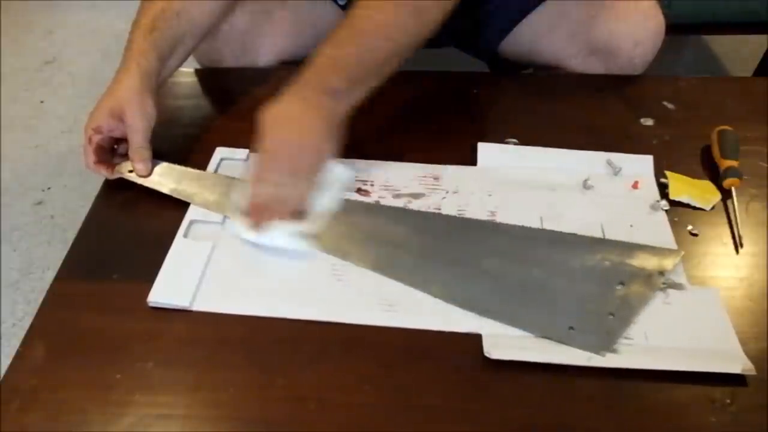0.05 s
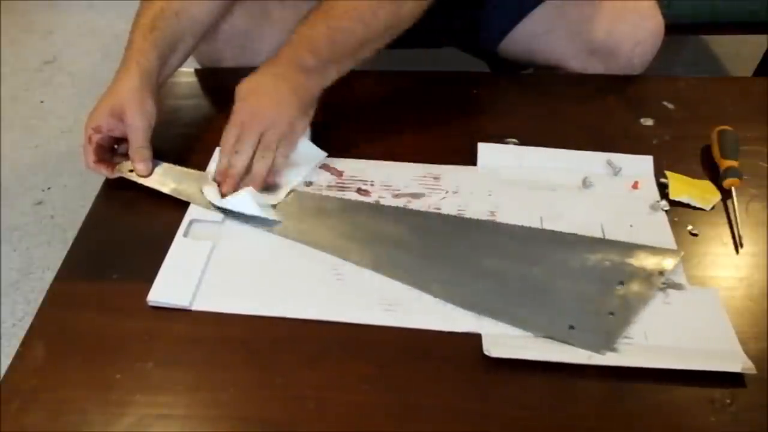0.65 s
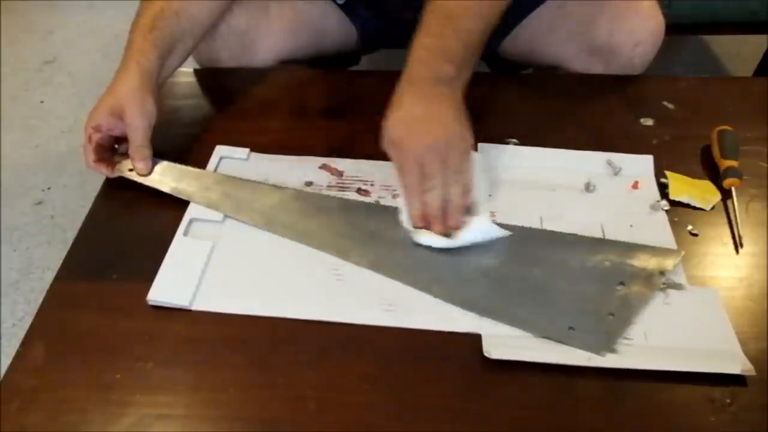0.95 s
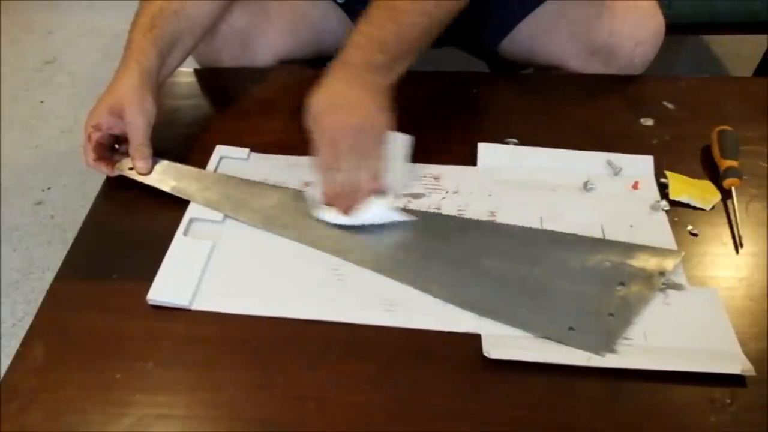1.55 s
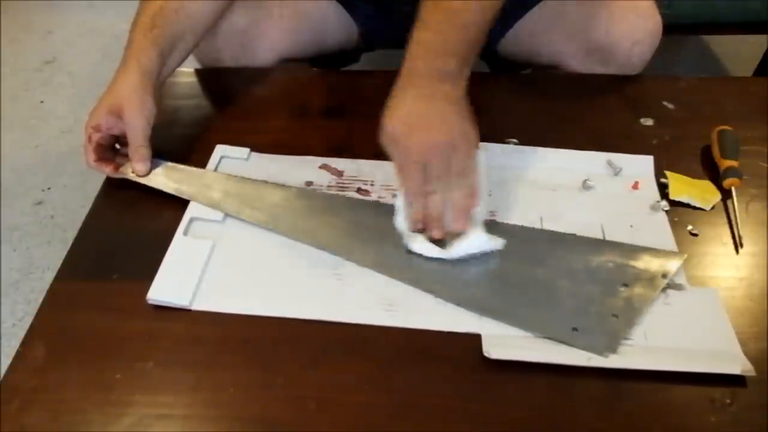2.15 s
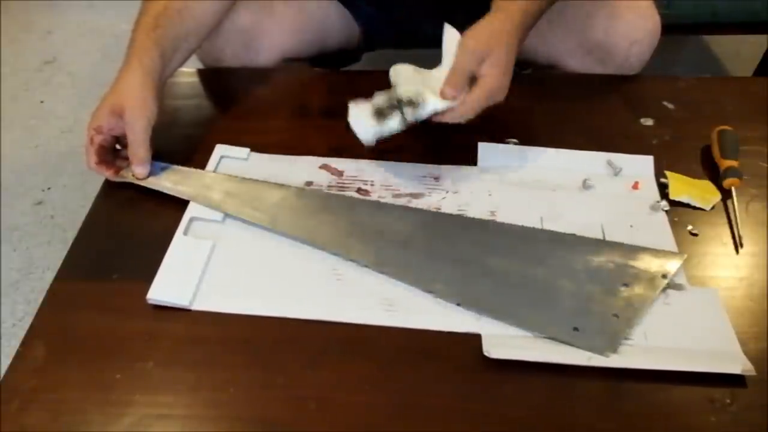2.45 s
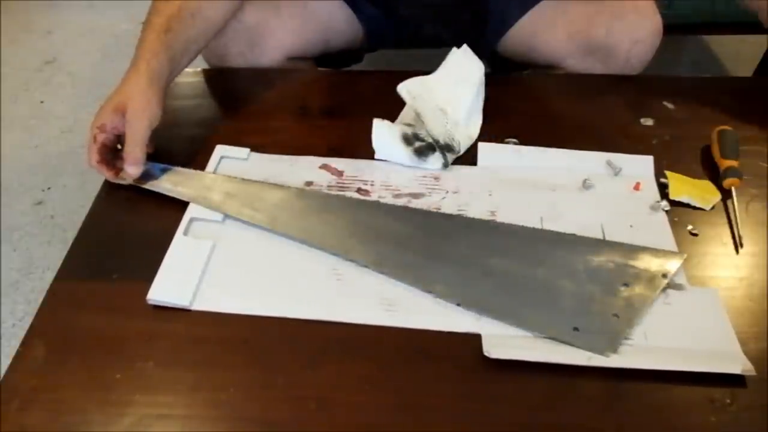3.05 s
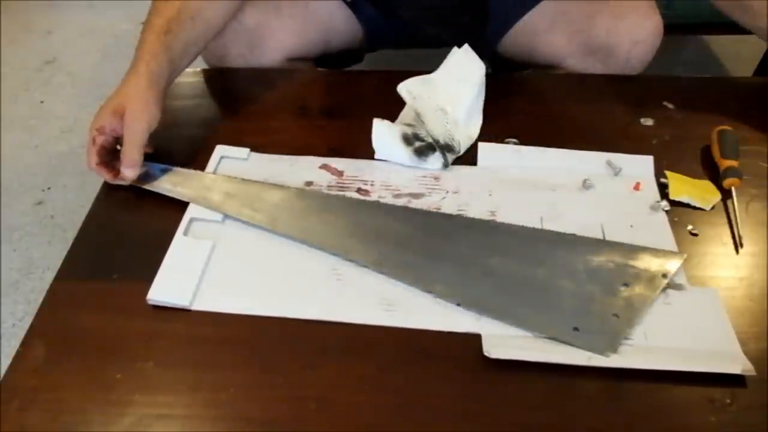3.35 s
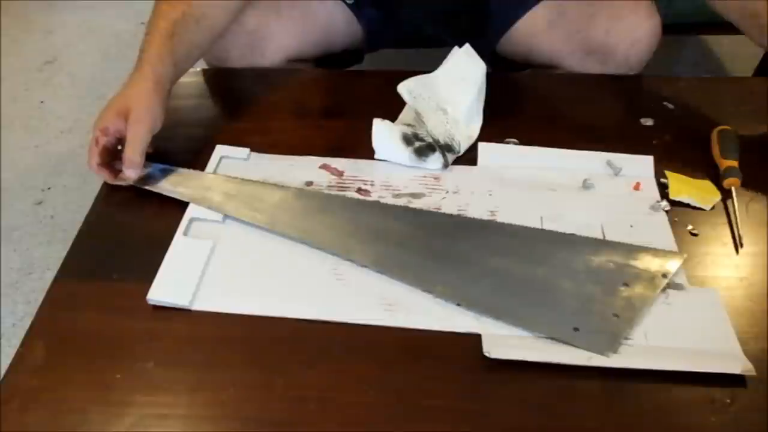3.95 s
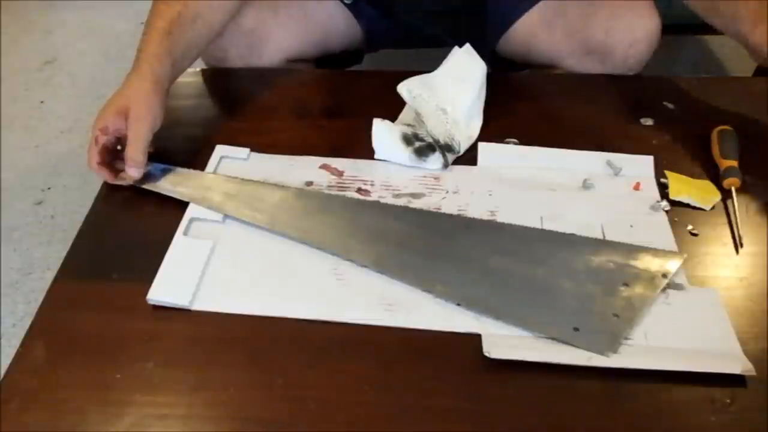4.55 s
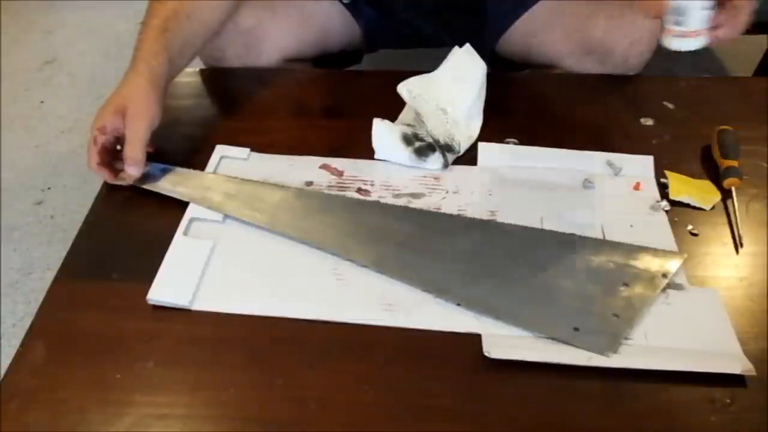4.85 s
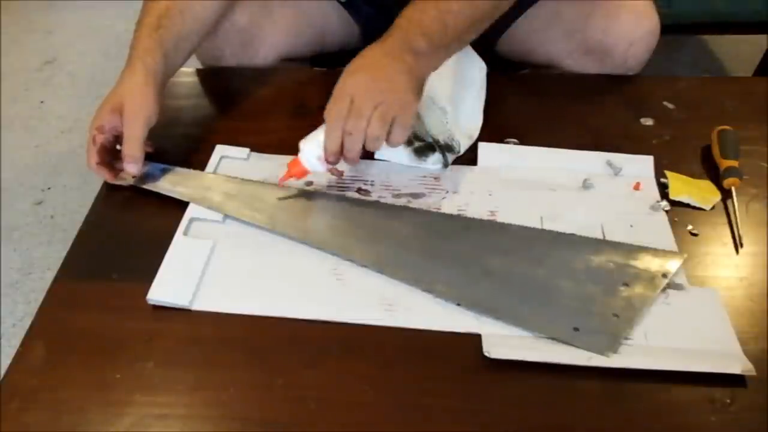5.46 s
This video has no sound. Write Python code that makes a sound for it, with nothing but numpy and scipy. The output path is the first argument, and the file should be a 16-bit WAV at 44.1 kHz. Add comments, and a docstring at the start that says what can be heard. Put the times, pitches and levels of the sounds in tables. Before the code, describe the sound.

In a small room with softly rushing air, a steel saw blade is wiped with a paper towel in about eight quick, hissing strokes, rattling lightly on a wooden table close by. After a rustle and a few clacks, an object lands on the table with a hard, resonant knock, by far the loudest sound, and quickly rocks to rest. Faint scuffs, small hollow bottle taps and a sharp clink on the blade end it.

```python
"""A paper towel is wiped to and fro along a steel saw blade on a wooden table in a small room.
Its fibres hiss; once a stroke it grips and the blade chatters, and the blade clacks when let go.
Something is set down hard and rocks to rest, making the table top ring and boom. Light things
scuff about, then a small hollow bottle taps and its tip strikes the blade. Air rushes softly behind."""
import sys
import numpy as np
from scipy import signal
from scipy.fft import rfft, irfft
from scipy.io import wavfile
from scipy.ndimage import uniform_filter1d

SR = 44100
rng = np.random.default_rng(int(sys.argv[2]) if len(sys.argv) > 2 else 0)


def master(y):
    """Save y as 16-bit WAV."""
    cut = np.clip(np.atleast_2d(y).T, -1, 1)
    pcm = np.round(cut * 32767)  # scale
    wavfile.write(sys.argv[1], SR, pcm.astype(np.int16))


N = 252238
T = np.arange(N) / SR
RING_T = T[:SR]  # one second for a sound to ring out

# Levels in the tables are relative. A fade time is how long a sound takes to drop by 60 dB.
# Towel strokes, each lasting until the next:
# (start [s], hiss level [dB], grip time [s], grip half-length [s], chatter level [dB])
STROKES = [(-.01, -64.5, 0.22, 0.055, -50.5), (0.294, -63, .41, 0.1, -48), (0.547, -64, 0.74, 0.09, -58.5),
           (0.803, -64, .93, 0.098, -49.5), (1.051, -65.5, 1.23, 0.037, -64), (1.31, -64, 1.46, 0.068, -46),
           (1.55, -66.5, 1.842, 0.027, -47.5), (1.927, -65.5, 2.02, 0.12, -46.5)]
# Tone of the rubbing paper fibres: (frequency [Hz], level [dB])
HISS_TONE = [(200, -6.5), (600, 1), (1250, 0), (2300, 2), (2900, -1), (3500, -1), (4400, -3.5), (6000, -10),
             (7500, -21), (15000, -46)]
# Tone of their finer, higher hiss: (frequency [Hz], level [dB])
FINE_HISS_TONE = [(1500, -9), (4000, -3.5), (6000, -3), (7800, -7.5), (10300, -10), (13000, -18),
                  (15500, -22)]
# Tone of coarse rubbing and clacking: (frequency [Hz], level [dB])
RASP_TONE = [(80, -24), (200, -8), (380, -3), (550, -5), (780, -3), (1150, 0), (1650, -2.5), (2150, -4),
             (2800, -12.5), (3700, -14), (5000, -22.5), (9000, -41), (15000, -58)]
# Tone of the table shaking under the blade: (frequency [Hz], level [dB])
SHAKE_TONE = [(40, -34), (110, -13), (200, -7), (290, -5), (390, -6.5), (550, -12.5), (800, -8.5),
              (1600, -26.5), (6000, -61)]
# Notes the steel blade rings at: (frequency [Hz], level [dB], fade time [s])
BLADE_NOTES = [(1010, -12, 0.23), (1168, -2, 0.075), (1262, 7, 0.07), (1750, -13, 0.088),
               (2160, -10.5, 0.044), (2580, -15, 0.033), (3350, -7, 0.031), (3620, 0.5, 0.015),
               (4400, -32, .018), (4700, -10.5, 0.016), (5400, -22, 0.054), (5900, -22, .016)]
# The blade clacks: it slaps its support, and at the end the bottle's tip strikes it:
# (time [s], level [dB], brightness [dB/octave], clink against clack [dB])
BLADE_CLACKS = [(.204, -39.5, 4, -13), (.422, -46, 2, -20), (.46, -40, 2.5, -13), (.705, -44.5, -7, -12),
                (.945, -43, -4.5, -13), (1.086, -52, -8.5, -9), (1.245, -50, -8, -14),
                (1.439, -36.5, -3, -5), (1.479, -42, 1.5, -5), (1.593, -54.5, -11, -12),
                (1.82, -44.5, 0.5, -9), (1.938, -46, -2, -9), (2.012, -47, -5, -6), (2.6154, -37, 1.5, -5),
                (2.6756, -45.5, 8, -9), (2.6878, -32.5, -1.5, 6), (2.7261, -38, 1.5, -6),
                (2.744, -45, -1, -12), (4.072, -56.5, -0.5, -9), (4.1943, -47.5, -3.5, -5),
                (5.4643, -47, 0.5, -10), (5.684, -39, 6, 11), (5.69, -37.5, -3, 7.5),
                (5.7032, -48, 3.5, -11)]
# Single knocks on the table: (time [s], level [dB], contact cut-off [Hz])
TABLE_KNOCKS = [(3.3883, -30.5, 650), (3.6339, -21.5, 2380), (3.7126, -11, 5020), (3.8404, -19.5, 440),
                (4.1864, -31.5, 452)]
# Notes the table top rings at: (frequency [Hz], level [dB], fade time [s])
TABLE_NOTES = [(197, 1, .47), (226, -1, .36), (243, 4, .4), (256, -8, .4), (289, 3, .46), (317, -9, .4),
               (412, -7.5, .33), (436, -12, .36), (471, -7, .33), (502, -5, .4), (550, 1, .42),
               (580, -9, .38), (636, -6, .33), (672, 2.5, .38), (727, -15, .3), (841, -14, .45),
               (922, -7.5, .28), (1097, -13, .33), (1204, -19, .28), (1281, -14, .26), (1391, -20, .33),
               (1427, -17, .3), (1583, -27, .36), (1943, -22, .3), (2430, -26, .28), (2890, -31, .28)]
# Tone of a thud on the wood: (frequency [Hz], level [dB])
THUD_TONE = [(25, -52), (55, -22), (90, -19), (155, -15), (205, 1.5), (350, -1.5), (660, -4), (800, -15),
             (1250, -15), (1750, -24), (2500, -27.5), (4500, -41), (7000, -58), (15000, -80)]
# Tone of the table's deep boom: (frequency [Hz], level [dB])
BOOM_TONE = [(30, -44), (55, -12), (90, -8), (130, -1), (190, -2), (300, -19), (1000, -72.5)]
# Tone of the sharp tick at the landing and each bounce: (frequency [Hz], level [dB])
TICK_TONE = [(500, -13.5), (2500, 2), (5500, -3), (7500, -12), (10000, -11.5), (12000, -24), (15000, -37)]
# Scuffs as the towel is lifted and dropped and things are moved:
# (middle [s], half-length [s], level [dB], crinkle against rub [dB])
SCUFFS = [(2.49, 0.21, -58.5, -14), (2.686, 0.0093, -43.5, -10), (2.746, 0.03, -50, -25),
          (3.04, 0.022, -67, -32), (4.19, 0.044, -52, -25), (4.4, 0.015, -65.5, -24),
          (4.8, 0.013, -60, -24), (5.289, .03, -60.5, -11.5)]
# Taps of the bottle: (time [s], level [dB])
BOTTLE_TAPS = [(5.3832, -45), (5.409, -52), (5.453, -45.5), (5.475, -48)]
# Notes the hollow bottle rings at: (frequency [Hz], level [dB], fade time [s])
BOTTLE_NOTES = [(558, -3, 0.028), (1166, -15.5, 0.027), (2070, -18.5, 0.018)]
# Tone of the air in the room: (frequency [Hz], level [dB])
AIR_TONE = [(20, -16.5), (55, -6), (100, -6.5), (200, -0.5), (350, -3.5), (600, -5), (1100, -11.5),
            (1700, -19), (2800, -22), (3700, -28.5), (4900, -31), (7000, -43), (10000, -49.5), (15000, -60)]
# Faint pitches in that rush of air: (frequency [Hz], width [Hz], level [dB])
AIR_PEAKS = [(1435, 120, -19), (1963, 390, -15), (2412, 110, -21.5), (4310, 550, -26.5)]
# How unlike the two ears are: (frequency [Hz], opposite part against shared part [dB])
STEREO_WIDTH = [(60, -2), (150, -12), (300, -8.5), (600, -9), (1200, -7.5), (4000, -6), (9000, -0.5),
                (14000, -0.5)]


def wiping():
    """Countless fibres hiss, brighter as the hand speeds up; coarser slips rattle blade and table."""
    speed, hiss_gain, chatter = hand_strokes()
    hiss = unit(colour(stereo_noise(N, side_db=0.5) + undb(-4) * slips(3000, 2.8), HISS_TONE))
    fine = unit(colour(stereo_noise(N, side_db=0) + undb(-3) * slips(2500, 2.3), FINE_HISS_TONE))
    fibres = (hiss * speed ** .5 * undb(5) + fine * speed ** .82 * undb(-2.5)) * hiss_gain
    steel_ring = unit(through(slips(600, 2.2), ring(BLADE_NOTES)))
    scrape = unit(colour(slips(900, 3.06), RASP_TONE))
    rasp = (scrape + undb(-12) * steel_ring) * chatter * undb(-4.5)
    shake = unit(colour(slips(500, 2.3), SHAKE_TONE)) * chatter ** .5 * undb(-38.5)
    rattle = room(rasp + shake, early_db=-3.5, late_db=-7)
    return place(fibres, pan_db=1.2, lag_s=0) + place(rattle, pan_db=.7, lag_s=1e-5)


def hand_strokes(stop_s=2.297, loose_chatter_db=-61):
    """The hand speeds up, grips once and slows to turn: gives its speed, hiss gain and chatter gain."""
    speed, hiss_gain, grip = np.zeros((3, N))
    ends = [row[0] for row in STROKES[1:]] + [stop_s]
    for (start, db, grip_s, half_s, grip_db), end in zip(STROKES, ends):
        during = (T >= start) & (T < end)
        progress = np.clip((T - start) / (end - start), 0, 1)
        speed += during * np.sin(np.pi * progress ** .82)  # fastest just before mid-stroke
        hiss_gain += during * undb(db)
        grip += during * swell(grip_s, half_s, grip_db)
    speed, hiss_gain, grip = uniform_filter1d(np.array([speed, hiss_gain, grip]), SR // 55)
    speed = np.clip(speed, 1e-6, 1)
    chatter = (abs(grip) + undb(loose_chatter_db)) * speed ** .14
    return speed, hiss_gain, chatter


def blade_clacks(clack_fade_s=.017, bump_fade_s=.07):
    """Hitting its support or struck by the bottle's tip, the blade clacks, clinks and bumps the table."""
    out, clink = np.zeros((2, N)), ring(BLADE_NOTES)
    rasp, shake = click(RASP_TONE), click(SHAKE_TONE)
    for s, db, brightness, clink_db in BLADE_CLACKS:
        buzz, sway = rng.standard_normal((2, SR))
        clack = unit_hit(through(buzz * fade(clack_fade_s), rasp))
        bump = unit_hit(through(sway * fade(bump_fade_s), shake))
        bump_db = db - 7.5 - .38 * brightness  # a softer contact bumps more
        add(out, s, undb(db - 8.5) * harden(clack + undb(clink_db) * clink, brightness))
        add(out, s, undb(bump_db) / (1 + undb(clink_db)) * bump)
    return place(room(out, early_db=-2.5, late_db=-3), pan_db=.42, lag_s=3e-5)


def table_knocks():
    """Each knock rings the table top and the room; a soft, long push also makes the table boom."""
    out, ticks = np.zeros((2, 2, N))
    thud, tick, wood = unit_hit(click(THUD_TONE)), unit_hit(click(TICK_TONE)), ring(TABLE_NOTES)
    boom = unit_hit(through(echoes(.6, .4, side_db=-3), click(BOOM_TONE)))
    knocks = list(TABLE_KNOCKS)
    for s, db, contact_hz, tick_db in rocking(count=4):
        knocks.append((s, db, contact_hz))
        add(ticks, s, undb(tick_db) * tick)
    for s, db, contact_hz in knocks:
        rattle = unit_hit(through(echoes(.13, .06, side_db=-2), thud))
        walls = unit_hit(through(echoes(.62, .34, side_db=0), thud))
        body = wood + undb(-6) * thud + undb(-5) * rattle + undb(-3.5) * walls
        boom_gain = 170 / contact_hz  # as strong as the body at a cut-off of 170 Hz
        add(out, s, undb(db - 6) * (soften(body, contact_hz) + boom_gain * boom))
    return place(out + room(ticks, early_db=-4, late_db=-8), pan_db=.53, lag_s=6e-5)


def rocking(count, landing_s=3.6847, first_gap_s=.0647, gap_ratio=.75):
    """Something lands hard and rocks: each bounce comes sooner, weaker and duller than the last."""
    bounce = np.arange(count)
    gaps = first_gap_s * gap_ratio ** bounce
    times = landing_s + np.cumsum(gaps) - gaps
    knock_db, tick_db = -3.5 - 8.5 * bounce, -49.5 - 4.5 * bounce
    contact_hz = 9050 * .46 ** bounce
    return zip(times, knock_db, contact_hz, tick_db)


def scuffs():
    """Paper and other light things slide a little: a grainy rub, with hiss where paper crinkles."""
    rub_gain = sum(swell(s, half_s, db) for s, half_s, db, _ in SCUFFS)
    crinkle_gain = sum(swell(s, half_s, db + crinkle_db) for s, half_s, db, crinkle_db in SCUFFS)
    rub = unit(soften(colour(slips(900, 1.7), RASP_TONE), contact_hz=3500))
    crinkle = unit(colour(slips(3000, 1.8), HISS_TONE))
    crinkle += undb(-8) * unit(colour(slips(2500, 3.1), FINE_HISS_TONE))
    return room((rub * rub_gain + crinkle * crinkle_gain) * undb(-5), early_db=-1, late_db=-6)


def bottle_taps():
    """Soft taps make a hollow plastic bottle ring very briefly."""
    out = np.zeros((2, N))
    for s, db in BOTTLE_TAPS:
        add(out, s, undb(db - 4.5) * ring(BOTTLE_NOTES))
    return room(out, early_db=-8, late_db=-4)


def room_air():
    """A low, even rush of air with a few faint pitches in it."""
    rush = unit(colour(stereo_noise(N, side_db=4), AIR_TONE))
    for hz, width_hz, db in AIR_PEAKS:
        b, a = signal.iirpeak(hz, hz / width_hz, fs=SR)
        band = signal.lfilter(b, a, stereo_noise(N, side_db=-5))
        rush += undb(db) * unit(signal.lfilter(b, a, band))
    return place(rush * undb(-60), pan_db=1.5, lag_s=2e-5)


def room(x, early_db, late_db):
    """The direct sound, then quick echoes off the table top, then slower ones off the walls."""
    early, late = echoes(.025, .018, side_db=1), echoes(.52, .3, side_db=1)
    early = undb(early_db) * early / np.linalg.norm(early[0])
    late = undb(late_db) * late / np.linalg.norm(late[0])
    return x + through(x, early + late)


def echoes(bass_fade_s, treble_fade_s, side_db):
    """A wash of echoes, built octave by octave; the treble dies first."""
    spectrum, out = rfft(stereo_noise(SR, side_db)), 0
    octave = np.clip(np.log2((np.arange(SR // 2 + 1) + 1) / 125), 0, 7)
    for k, fade_s in enumerate(np.geomspace(bass_fade_s, treble_fade_s, 8)):
        band = irfft(spectrum * np.maximum(1 - abs(octave - k), 0))
        out = out + band * fade(fade_s)
    return out


def slips(per_s, spread_db):
    """Tiny random slips of uneven size, the grain of a rubbing sound."""
    kicks = (rng.random(N) < per_s / SR) * rng.choice([-1, 1], N)
    sizes = undb(spread_db * np.minimum(rng.exponential(size=N), 4))
    return unit(kicks * sizes)


def swell(middle_s, half_s, db, shape=1.58):
    """Gain of a rub that builds up and dies away; shape 1 is a spike, 2 a rounded hill."""
    return undb(db) * np.exp(-abs((T - middle_s) / half_s) ** shape)


def ring(notes):
    """A struck object's own notes fade away; neighbours start in opposite directions."""
    return unit_hit(sum((-1) ** k * undb(db) * np.sin(2 * np.pi * hz * RING_T) * fade(fade_s)
                        for k, (hz, db, fade_s) in enumerate(notes)))


def fade(fade_s):
    """A gain that drops by 60 dB in fade_s."""
    return np.exp(-np.log(1000) * RING_T / fade_s)


def harden(x, db_per_octave):
    """A harder contact tilts the sound towards the treble; a negative tilt dulls it."""
    return unit_hit(through(x, click([(200, 0), (12800, 6 * db_per_octave)])))


def soften(x, contact_hz):
    """A softer contact pushes for longer and barely stirs the notes above its cut-off."""
    lowpass = signal.butter(3, min(contact_hz, SR / 3), fs=SR, output="sos")
    return unit_hit(signal.sosfilt(lowpass, x))


def click(tone):
    """The sharpest click that has this tone."""
    cepstrum = irfft(np.log(tone_gains(tone, SR)))
    cepstrum[1:SR // 2] *= 2  # fold it so that nothing sounds before the hit
    cepstrum[SR // 2 + 1:] = 0
    return irfft(np.exp(rfft(cepstrum)))


def colour(x, tone):
    """Give a steady sound this tone."""
    size = x.shape[-1]
    return irfft(rfft(x) * tone_gains(tone, size), size)


def tone_gains(tone, size):
    """Join the points of a tone table into a gain for every frequency."""
    hz, db = np.transpose(tone)
    return undb(np.interp(np.log(np.fft.rfftfreq(size, 1 / SR) + 1), np.log(hz), db))


def through(x, response):
    """Let every sample of a sound set off a response, such as a ring or an echo."""
    return signal.fftconvolve(np.atleast_2d(x), np.atleast_2d(response), axes=-1)[:, :x.shape[-1]]


def stereo_noise(size, side_db):
    """Noise from all round; side_db raises the part that is opposite at the two ears."""
    shared, side = rng.standard_normal((2, size))
    side = undb(side_db) * colour(side, STEREO_WIDTH)
    return np.array([shared + side, shared - side])


def place(x, pan_db, lag_s):
    """The left ear hears it louder by pan_db and later by lag_s."""
    left, right = np.broadcast_to(x, (2, N))
    return np.array([np.interp(T - lag_s, T, left) * undb(pan_db / 2), right * undb(-pan_db / 2)])


def add(out, s, sound):
    """Mix a sound in at s seconds."""
    start = int(s * SR)
    out[:, start:start + sound.shape[-1]] += sound[..., :N - start]


def undb(db):
    """Turn decibels into a gain."""
    return 10 ** (np.asarray(db) / 20)


def unit(x):
    """Scale to an average strength (rms) of 1."""
    return x / np.sqrt(np.mean(x ** 2))


def unit_hit(x):
    """Scale a hit to the energy of 10 ms at strength 1."""
    return x / np.sqrt(np.mean(np.sum(x ** 2, axis=-1)) / (SR / 100))


def scene():
    """All the sources heard together."""
    return wiping() + blade_clacks() + table_knocks() + scuffs() + bottle_taps() + room_air()


def record(dry, bass_hz=35, top_hz=15550):
    """Thin out the deepest bass and cut off the highest treble."""
    thinned = signal.sosfilt(signal.butter(2, bass_hz, "high", fs=SR, output="sos"), dry)
    return signal.sosfilt(signal.ellip(10, .2, 70, top_hz, fs=SR, output="sos"), thinned)


dry = scene()
out = record(dry)
master(out)
```